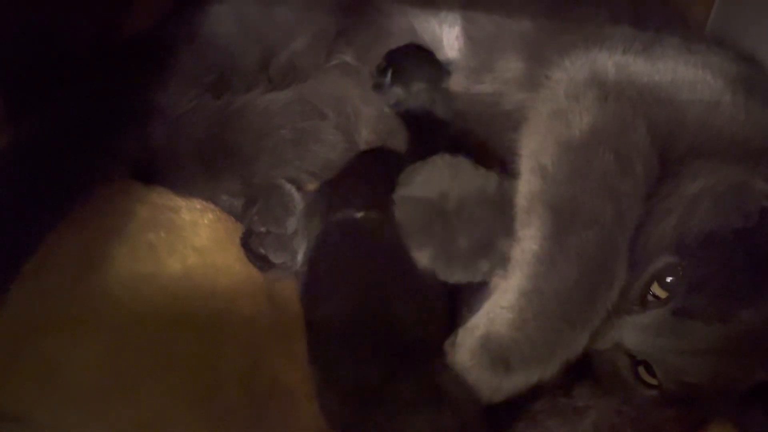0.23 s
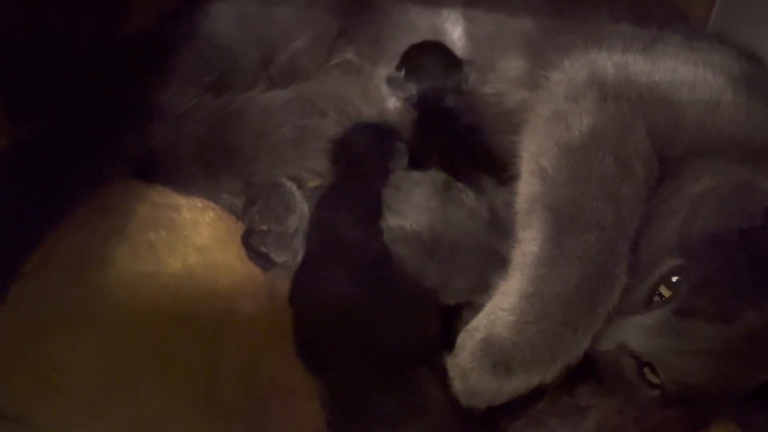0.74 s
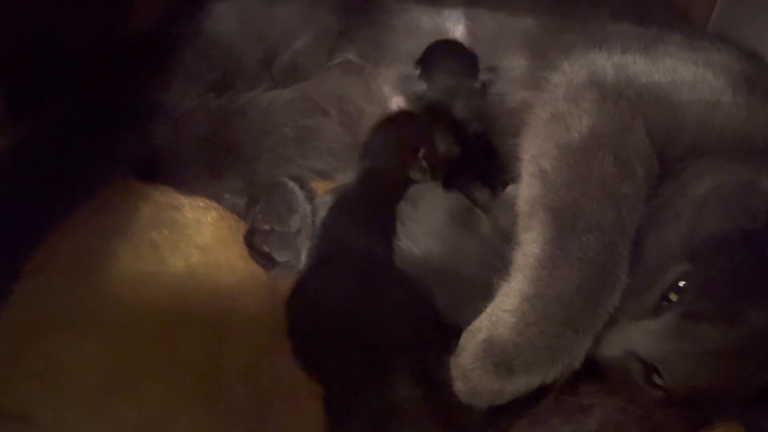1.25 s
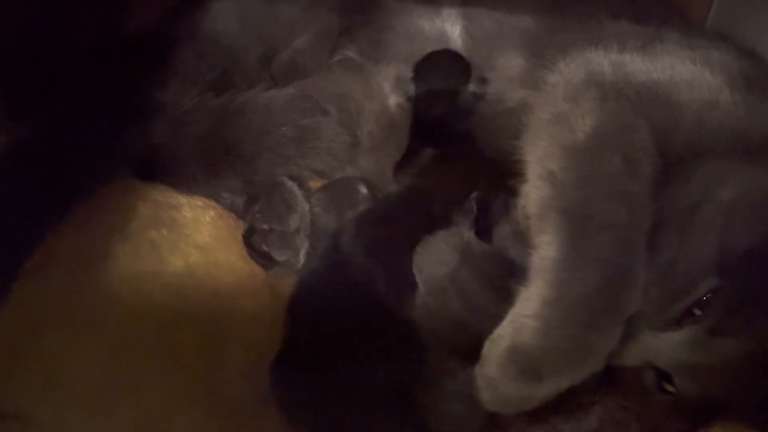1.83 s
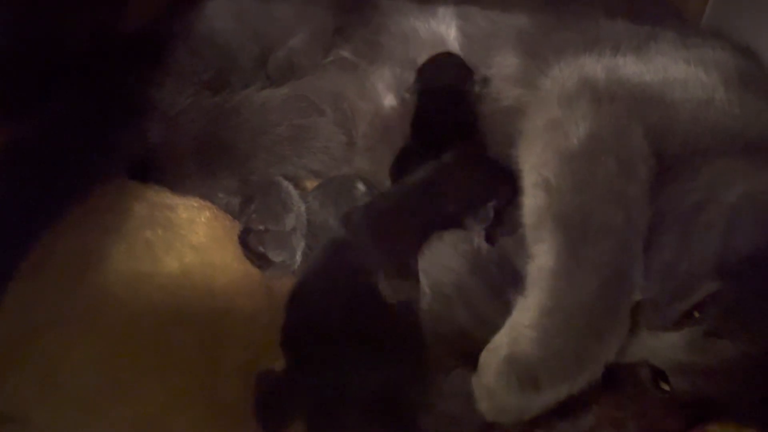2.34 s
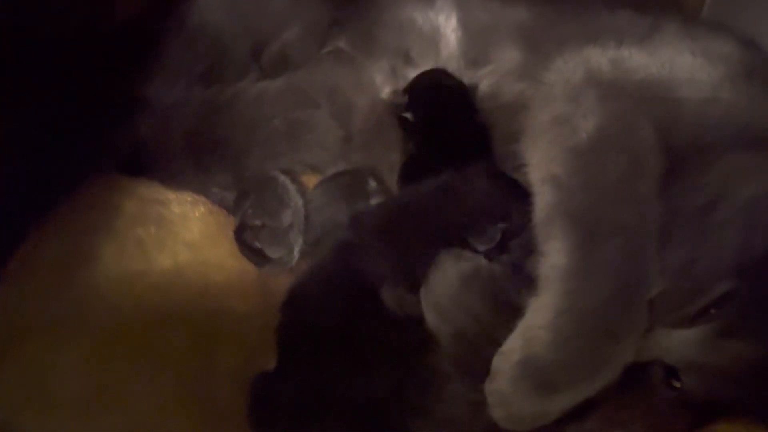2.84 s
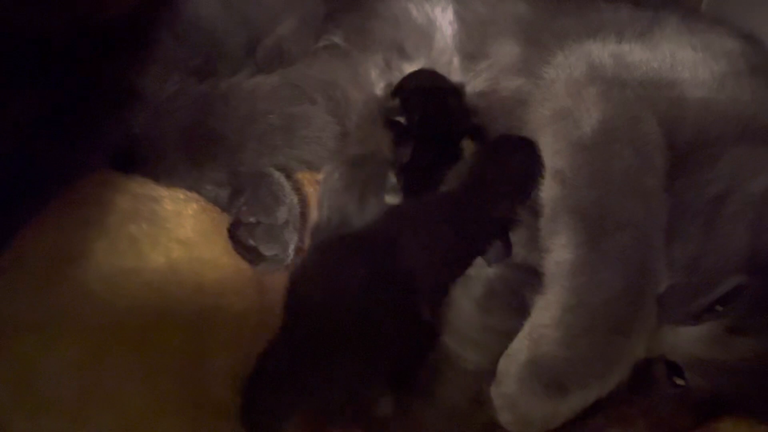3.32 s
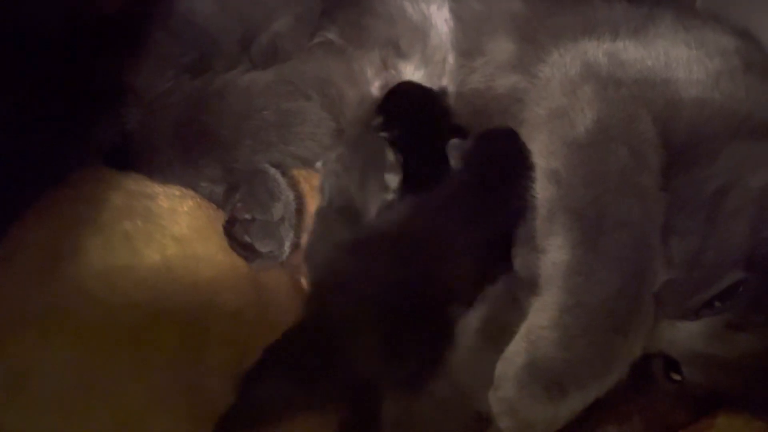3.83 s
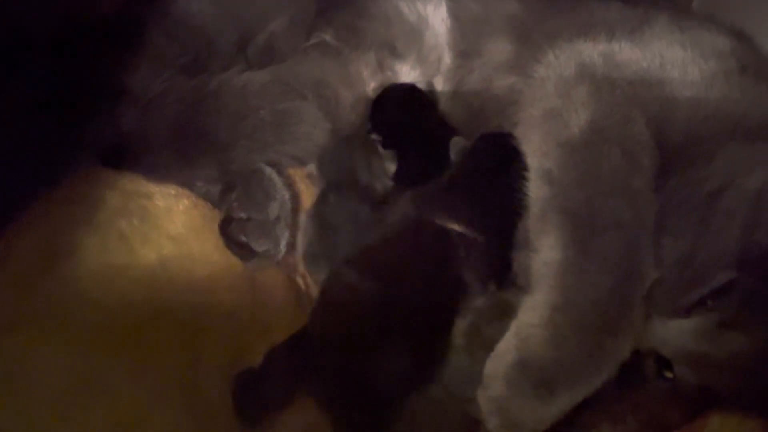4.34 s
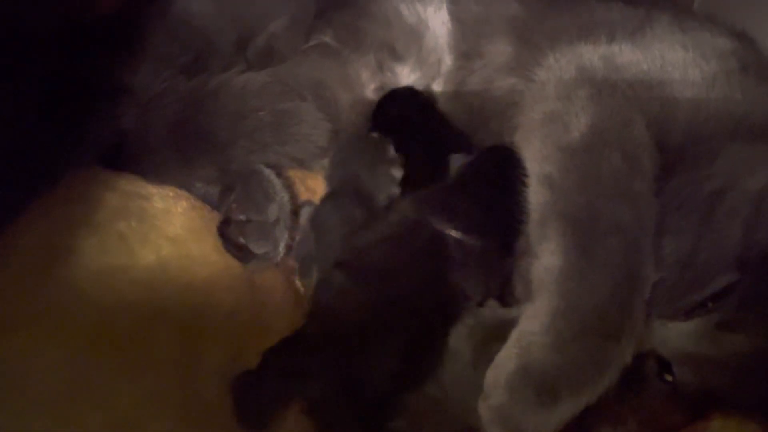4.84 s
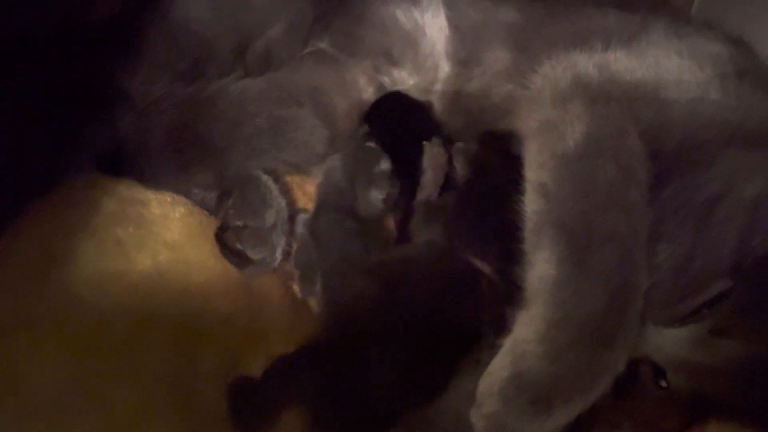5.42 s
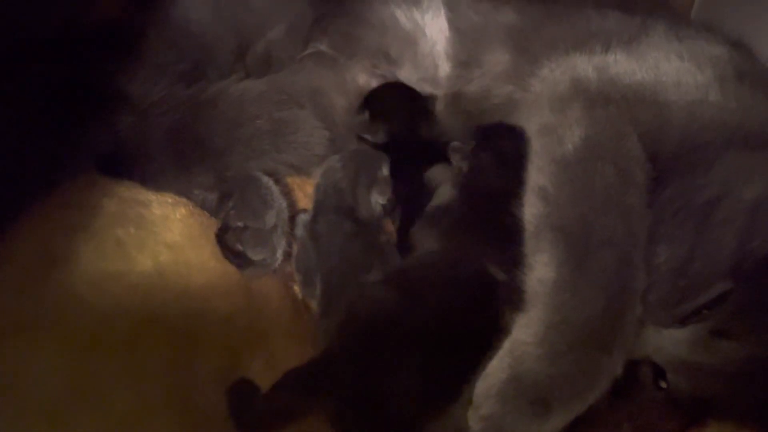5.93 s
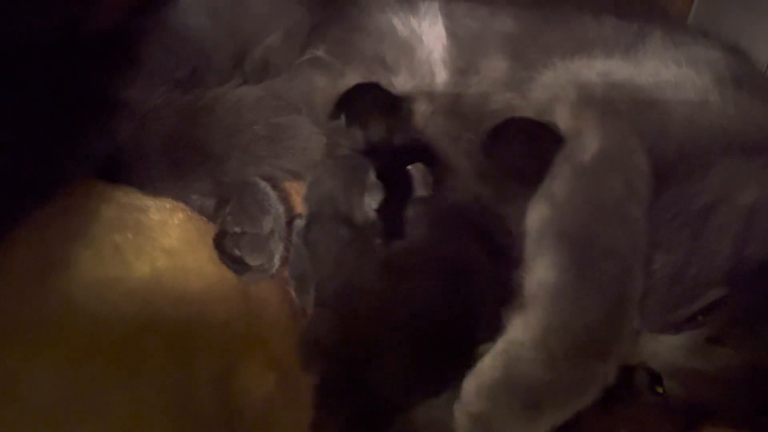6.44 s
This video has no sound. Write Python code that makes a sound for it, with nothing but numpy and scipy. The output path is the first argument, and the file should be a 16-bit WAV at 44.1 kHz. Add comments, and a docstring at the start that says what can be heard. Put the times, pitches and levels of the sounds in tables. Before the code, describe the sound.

Newborn kittens mew thinly, raspy starts rising to clear high cries, over their mother's soft purr, with wet mouth clicks and dull nest-box bumps.

```python
"""In a nest box, newborn kittens crawl over their purring mother, close to the microphone.
Four thin mews, built from wavering harmonics, start with a rasp and rise to a clean cry.
Short squeaks, rasps and wet mouth clicks, made of shaped noise, fall within and between them.
The purr is a train of pulses. Paws tap and bump the box as noise and fading tones, and noise in
small slips makes the bedding rustle. Fur brushes past once; faint hiss and rumble lie behind."""
import sys
import numpy as np
from scipy import signal
from scipy.fft import rfft, irfft, next_fast_len
from scipy.io import wavfile
from scipy.ndimage import uniform_filter1d, map_coordinates

SR = 44100
rng = np.random.default_rng(int(sys.argv[2]) if len(sys.argv) > 2 else 0)


def to_wav(sig):
    """Store sig (one row per channel, or 1-D mono) as 16-bit WAV at the path in sys.argv[1].

    Samples outside -1..1 are clipped; the rate is SR.
    """
    pcm = np.clip(np.atleast_2d(sig), -1, 1) * 32767
    pcm = np.round(pcm).astype(np.int16)
    wavfile.write(sys.argv[1], SR, pcm.T)  # frames by channels


N = 294147  # length of the scene in samples
TOP_HZ = 14900  # upper limit of all sound

# air rushing through a kitten's throat: f/Hz, level/dB
RASP = [(600, -30), (1400, -22), (1900, -9), (2800, 0), (3250, -3), (3750, -16), (4500, -3), (5200, -10),
        (6000, -27), (8200, -38), (11000, -30), (15000, -40)]


def amp(db):
    """Turn decibels into gain."""
    return 10 ** (np.asarray(db) / 20)


def unit(x):
    """Scale x to an rms (average strength) of 1."""
    return x / np.sqrt(np.mean(x ** 2) + 1e-20)


def along(points, hz):
    """Read a table of (f/Hz, value) at any frequency, on a log axis."""
    f, v = np.transpose(points)
    return np.interp(np.log(hz + 1), np.log(f), v)


def curves(rows, t):
    """Read each column after the time at times t."""
    s, *cols = np.transpose(rows)
    return [np.interp(t, s, c) for c in cols]


def swells(rows, edge, t):
    """Gain at times t of (t/s, length/s, level/dB) events that rise, hold and fall; edge in s."""
    total = 0
    for s, length, db in rows:
        to_nearest_end = np.minimum(t - s, s + length - t)
        total = total + amp(db) * np.sin(np.pi / 2 * np.clip(to_nearest_end / edge, 0, 1))
    return total


def wobble(rate, size):
    """A smooth random curve with rate random points a second."""
    points = rng.standard_normal(int(size * rate / SR) + 4)
    return map_coordinates(points, [np.arange(size) * rate / SR])


def filtered(x, gain):
    """Multiply the spectrum of x by a gain that depends on frequency."""
    n = x.shape[-1]
    m = next_fast_len(n + 8192)  # spare room keeps the end from wrapping onto the start
    return irfft(rfft(x, m) * gain(np.fft.rfftfreq(m, 1 / SR)), m)[..., :n]


def noise(spectrum, size):
    """Noise coloured by a (f/Hz, level/dB) table, at rms 1."""
    white = rng.standard_normal(size)
    return unit(filtered(white, lambda hz: amp(along(spectrum, hz))))


def response(spectrum, size=8192):
    """How a body with this spectrum rings after one sharp push, with nothing before the push."""
    cepstrum = irfft(np.log(amp(along(spectrum, np.fft.rfftfreq(size, 1 / SR)))))
    # folding the cepstrum onto positive times gives the earliest possible ringing
    cepstrum[1:size // 2] *= 2
    cepstrum[size // 2 + 1:] = 0
    return irfft(np.exp(rfft(cepstrum)))


def add(track, s, sound):
    """Mix a sound into the track at time s."""
    part = track[max(0, round(s * SR)):][:len(sound)]
    part += sound[:len(part)]


def share(gain, hz):
    """Silence harmonics above the top limit and scale the rest to a total power of 1."""
    kept = gain * (hz < TOP_HZ)
    return kept / np.linalg.norm(kept, axis=0)


def mew(rows, settle, throat_ratio, fundamental_db, flutter_db, jitter=0.055, quiver=0.0058,
        shimmer=0.55, rasp=0.054, edge=0.001, muffle_hz=7800, count=36):
    """One cry: harmonics of the vocal folds, which beat unevenly at first, shaped by the opening mouth."""
    # the throat's resonances with the mouth nearly shut, half open and wide open: f/Hz, level/dB
    mouth_shut = [(450.0, -14), (650.0, -10.5), (900.0, -9.5), (1100.0, -27), (1350.0, -16.5),
                  (1750.0, -22), (2200.0, -13), (2900.0, -0.0), (3350.0, -7.5), (3800.0, -17.5),
                  (4250.0, -12), (4650.0, -20.5), (5400.0, -29), (6400.0, -59), (7600.0, -55)]
    mouth_half = [(450.0, -34), (650.0, 0.5), (900.0, -13), (1100.0, -16), (1350.0, -14), (1750.0, 1.5),
                  (2200.0, -16.0), (2900.0, -24), (3350.0, -29), (3800.0, -18.5), (4250.0, -23.5),
                  (4650.0, -55), (5400.0, -62), (6400.0, -41.5), (7600.0, -64)]
    mouth_wide = [(450.0, 0.0), (650.0, 4), (900.0, -10.0), (1100.0, -18), (1350.0, -31), (1750.0, -9),
                  (2200.0, 4), (2900.0, -17), (3350.0, -46), (3800.0, -35), (4250.0, -28.5), (4650.0, -28),
                  (5400.0, -36), (6400.0, -25.5), (7600.0, -61)]
    # where the lift of the treble acts: f/Hz, share (0-1)
    treble_share = [(2900, 0.09), (4300, 0.91)]
    # times when the voice strains and gains a shrill top: t/s, length/s, relative level/dB
    strains = [(.835, 0.085, -78.5), (2.605, 0.054, -90), (2.85, 0.1, -92.5), (3.36, 0.5, -100),
               (5.98, 0.19, -72.5), (6.15, 0.17, -73.5), (6.33, 0.37, -79)]
    # colour of that shrill top: f/Hz, level/dB
    shrill_spectrum = [(6000, -35), (7700, -8), (8400, -41), (9700, -6.5), (11000, -3), (12300, 6),
                       (13500, -10.5), (15000, -25)]
    strain_edge_s = .015
    onset_rough, clean_rough = 0.51, 0.027  # roughness added at the start, and once settled

    t = np.arange(rows[0][0], rows[-1][0], 1 / SR)
    n = len(t)
    pitch, level_db, opening, treble_db = curves(rows, t)
    rough = clean_rough + onset_rough * np.exp(-((t - t[0]) / settle) ** 2)
    unsteady = quiver * wobble(69.92, n) + jitter * rough * wobble(600, n)
    pitch = uniform_filter1d(pitch, size=950) * (1 + unsteady)
    phase = 2 * np.pi * np.cumsum(pitch) / SR
    k = np.arange(1, count + 1)[:, None]  # harmonic numbers
    hz = k * pitch

    # the harmonics slide through resonances that change as the mouth opens
    shut, wide = np.clip(1 - 2 * opening, 0, 1), np.clip(2 * opening - 1, 0, 1)
    shapes = [(shut, mouth_shut), (1 - shut - wide, mouth_half), (wide, mouth_wide)]
    throat_db = sum(weight * along(shape, hz / throat_ratio) for weight, shape in shapes)
    throat_db = throat_db + fundamental_db * (k == 1)
    colour = amp(throat_db + treble_db * along(treble_share, hz)) / (1 + (hz / muffle_hz) ** 20)
    gains = amp(level_db) * share(colour, hz)

    shrill_flutter_db = 6.1 * np.array([wobble(25, n) for _ in k])
    shrill = share(amp(along(shrill_spectrum, hz) + shrill_flutter_db), hz)
    gains += swells(strains, strain_edge_s, t) * shrill
    # upper harmonics waver more than the lowest ones
    gains *= amp(flutter_db * np.minimum(k, 4) * np.array([wobble(44.9, n) for _ in k]))

    voice = np.sqrt(2) * np.sum(gains * np.sin(k * phase), axis=0)
    voice *= 1 + shimmer * rough * wobble(500, n)
    # turbulence escapes once per cycle
    air = rasp * rough * np.linalg.norm(gains, axis=0) * noise(RASP, n) * (1 + np.cos(phase))
    fade = np.clip(np.minimum(t - t[0], t[-1] - t) / edge, 0, 1)
    return (voice + air) * fade


def kittens(width_hz=380, focus_db=13, mew_db=0.24):
    """The long mews, and short bursts of throaty noise: squeaks, and hoarse rasps at the mews' edges."""
    # one table per mew: t/s, pitch f/Hz, relative level/dB, mouth opening (0-1), lift of the treble/dB
    mews = [
        [(0.833, 276.8, -77, 0.0, -5), (0.865, 413, -63, 0.0, 5), (0.895, 438, -63.5, 0.0, 11),
         (0.92, 512, -62, 0.02, 8), (0.95, 607, -63.5, 0.12, 4), (0.975, 565, -67.4, 0.1, 1),
         (1.015, 689, -68, 0.14, -5), (1.07, 639, -67, 0.17, -10.0), (1.1, 697, -69, 0.14, -19),
         (1.135, 712, -69, 0.12, -15), (1.19, 891, -63, 0.37, 5), (1.255, 947, -64, 0.35, -6),
         (1.292, 887, -58, 0.42, 10)],
        [(2.6, 530.5, -64, 0.3, 3), (2.655, 729.0, -61.5, 0.05, -6), (2.72, 710.5, -64.8, 0.09, -9.0),
         (2.775, 722, -67.3, 0.25, -8), (2.83, 965, -57, 0.63, -4), (2.88, 990.0, -64, 0.46, -4),
         (2.95, 940.4, -60.6, 0.41, -2), (3.06, 1002, -58, 0.49, -0.5), (3.14, 896, -56, 0.32, -4.5),
         (3.255, 1018, -55, 0.57, -8.0), (3.325, 967, -46, 0.75, -16.5), (3.38, 940, -49, 0.82, -9),
         (3.435, 882, -47.5, 0.7, -8.5), (3.48, 913.4, -49, 0.76, -11.5), (3.55, 894.4, -48.5, 0.77, -10),
         (3.61, 929.6, -49, 0.76, -8), (3.68, 904, -49, 0.72, -5.0), (3.735, 900, -48.5, 0.84, -9.0),
         (3.79, 663, -56, 0.47, 1.5), (3.81, 637, -61, 0.6, -2)],
        [(5.3, 769, -66, 0.4, 12), (5.34, 803, -63.5, 0.31, 6), (5.38, 860, -62.5, 0.29, -6),
         (5.415, 871, -64, 0.29, -2), (5.455, 942, -65.5, 0.32, 3), (5.51, 856, -61, 0.3, -3),
         (5.562, 863, -60, 0.38, 2.0)],
        [(5.87, 555, -66.5, 0.17, 11), (5.91, 664, -63, 0.1, 0.5), (5.96, 924, -61.5, 0.16, 14),
         (5.992, 946, -59, 0.17, 5), (6.04, 963, -61, 0.25, 5.0), (6.085, 994, -58.5, 0.15, -2.0),
         (6.125, 930, -60, 0.18, 2), (6.175, 982.0, -62.5, 0.28, -4), (6.225, 1110, -57.5, 0.82, 2),
         (6.275, 1040, -51.5, 0.96, 1.0), (6.33, 1131, -56.5, 0.91, 2), (6.41, 1148, -58, 1.0, 9),
         (6.51, 1107, -55, 0.72, 11.5), (6.575, 1046, -55.5, 0.76, -7.5), (6.62, 1143, -52.3, 0.77, 1),
         (6.668, 983, -47, 0.65, -16)],
    ]
    # the voice of each mew: time for the folds to settle/s, throat resonances as a ratio of the usual,
    # lift of the fundamental/dB, flutter/dB
    voices = [(.11, 0.992, -3.5, 0.65), (.035, 0.986, 0.4, 0.24), (.015, 1.022, 3.5, .7),
              (.07, 1.006, 1, 0.73)]
    # short hoarse squeaks and rasps: t/s, length/s, level/dB, resonance f/Hz
    bursts = [(.008, 0.041, -78, 3670), (0.251, 0.033, -76, 3360), (0.563, 0.011, -83.5, 3270),
              (0.824, 0.096, -68.5, 3000), (0.817, 0.13, -72.5, 4840), (0.969, 0.022, -70.5, 2210),
              (1.287, 0.045, -76.5, 2200), (1.29, 0.04, -78, 3500), (1.636, 0.034, -63.5, 2320),
              (1.655, 0.026, -74.5, 4420), (2.238, .032, -73, 2550), (2.239, 0.026, -70.5, 3840),
              (2.604, 0.029, -73, 3720), (3.778, 0.016, -74, 2540), (3.78, 0.036, -74.5, 3890),
              (5.292, 0.018, -70.5, 2200), (5.287, 0.02, -82, 3940), (5.862, 0.05, -81, 2680),
              (5.557, 0.038, -77, 3000)]

    out = np.zeros(N)
    for rows, voice in zip(mews, voices):
        add(out, rows[0][0], amp(mew_db) * mew(rows, *voice))
    for s, length, db, hz in bursts:
        n = int(length * SR)
        creak = noise(RASP, n) * amp(3.3 * wobble(600, n))
        # one resonance stands out
        creak = filtered(creak, lambda f: 1 + amp(focus_db) / (1 + ((f - hz) / width_hz) ** 4))
        add(out, s, amp(db) * unit(creak) * signal.windows.tukey(n, .5))
    return out


def clicks(t60=0.015, soft=0.00025):
    """Lips and tongues part with a tiny wet snap: noise that fades by 60 dB in t60 s."""
    # wet mouth clicks: t/s, relative level/dB, middle/dB, top/dB
    snaps = [(0.179, -65, -17, -1), (0.9856, -52, -9, -1), (1.29, -51.5, 7, -52), (1.6591, -53, -3, -25),
             (1.6716, -54, -6.5, -15), (1.6905, -61, -3, -32), (2.131, -63.5, -11, -44),
             (2.2276, -53, -11, -46), (2.579, -57.5, -2, -31), (2.598, -54, -9, -31.5),
             (5.0503, -53.5, -3.5, -13.5), (5.558, -53.5, 0, -54), (5.967, -49, -9, -4.5),
             (5.98, -52, -0.5, -5)]
    # colours of the middle and the top: f/Hz, level/dB
    mouth = [(500, -7.5), (1300, -22), (1900, 9.5), (2700, -4.5), (3300, -1.5), (4400, -8),
             (5600, -22.5), (9000, -46.0)]
    spit = [(5000, -8), (7000, -8), (8200, -17), (10800, 6), (13000, -4.5), (15000, -10.5)]

    out, t = np.zeros(N), np.arange(SR // 20) / SR
    shape = amp(-60 * t / t60) * (1 - np.exp(-t / soft))
    for s, db, middle_db, top_db in snaps:
        snap = amp(middle_db) * noise(mouth, len(t)) + amp(top_db) * noise(spit, len(t))
        add(out, s, amp(db - 2.5) * unit(snap) * shape)
    return out


def paws(tap_t60=0.041, thud_t60=0.02, thud_hz=330, soft=0.0015):
    """Light taps on the box wall, and heavy bumps that set its floor booming and its walls humming."""
    # paws and claws tapping the box: t/s, tap level/dB, relative thud level/dB
    taps = [(2.486, -51.5, -13), (3.852, -61.5, 12.5), (5.052, -52.5, 5), (6.263, -63.5, -8),
            (6.372, -54, -16)]
    # bodies bumping the box: t/s, level/dB, floor ring f/Hz, time to fade by 60 dB/s, rise/s,
    # relative wall ring/dB
    bumps = [(1.835, -46.5, 99.7, 0.12, 0.026, 1.5), (2.368, -23, 67.4, 0.15, 0.012, -32.5),
             (2.439, -37.5, 54.4, 0.69, 0.0051, -42), (3.253, -58, 81.7, 0.17, 0.035, 10.5),
             (4.633, -26, 96.7, 0.16, 0.015, -9), (4.696, -27, 81.8, 0.12, 0.0039, -13.5),
             (4.77, -35, 64.3, 0.25, 0.0076, -16.5), (5.054, -42, 89, 0.13, 0.0017, -2.5),
             (6.01, -14, 57.8, 0.25, 0.033, -37.5), (6.09, -30, 94, 0.25, 0.0043, -28),
             (6.143, -25, 57, 0.28, 0.014, -41), (6.254, -28, 60.1, 0.11, 0.0063, -31.5)]
    # tones of the box walls: f/Hz, relative level/dB, time to fade by 60 dB/s
    wall_modes = [(140, -1, .2), (172, -4, .2), (237, 1, .25), (285, -4, .16), (335, -7, .17),
                  (375, -11, .22), (430, -12, .18)]
    # colour of a tap: f/Hz, level/dB
    tap_spectrum = [(200, -16.0), (500, 3.5), (1100, -8), (2000, -21.5), (4000, -28.5), (12000, -38.5)]

    out, t = np.zeros(N), np.arange(SR * 3 // 4) / SR
    for s, db, thud_db in taps:
        tap = noise(tap_spectrum, len(t)) * amp(-60 * t / tap_t60)
        thud = np.sin(2 * np.pi * thud_hz * t) * amp(thud_db - 60 * t / thud_t60)
        add(out, s, (amp(db) * tap + amp(db - 10.0) * thud) * (1 - np.exp(-t / soft)))
    for s, db, floor_hz, t60, rise, wall_db in bumps:
        floor = -amp(-60 * t / t60) * np.sin(2 * np.pi * floor_hz * t)
        walls = np.zeros(len(t))
        for hz, level, life in wall_modes:
            walls += amp(level - 60 * t / life) * np.sin(2 * np.pi * (hz * t + rng.random()))
        ring = floor + amp(wall_db - 7.5) * walls
        add(out, s, amp(db) * ring * (1 - np.exp(-(t / rise) ** 2)))
    return out


def purr(rate_hz=27.8, murk_db=-7):
    """The mother's larynx snaps open in slow pulses that thump through her chest."""
    # she purrs in swells, as she draws air and as she lets it out: t/s, length/s, relative level/dB
    breaths = [(-.06, 0.12, -53), (.1, 0.19, -58.5), (.33, 0.26, -63.5), (.65, 0.095, -66),
               (.79, .4, -55.5), (1.27, 0.29, -61), (1.56, 0.16, -60.5), (1.81, .34, -52.5),
               (2.2, 0.26, -62), (2.52, 0.22, -62.5), (2.83, 0.55, -53.5), (3.37, .36, -61.5),
               (3.74, 0.33, -58), (4.01, 0.36, -52), (4.48, 0.18, -59), (4.8, 0.38, -56),
               (5.2, 0.34, -52.5), (5.49, 0.14, -49.5), (5.61, .15, -54), (5.77, 0.63, -59),
               (6.31, 0.41, -52)]
    # colour of her chest: f/Hz, level/dB
    chest_spectrum = [(20, -42), (30, -20.5), (42, -13.5), (56, 4.5), (85, 3), (115, -1), (165, -9),
                      (230, -18.5), (300, -39.5), (500, -43.5), (1200, -81)]
    edge_s, rest_db = 0.083, -71.5  # rise and fall of a swell; level always present beneath the swells

    effort = amp(rest_db) + swells(breaths, edge_s, np.arange(N) / SR)
    rate = rate_hz * (1 + 0.022 * wobble(3, N) + .02 * wobble(25, N))
    cycles = np.cumsum(rate) / SR
    # one pulse as each cycle completes, of uneven strength
    pulses = np.diff(np.floor(cycles), prepend=0) * amp(2.4 * wobble(28, N))
    chest = unit(signal.fftconvolve(pulses, response(chest_spectrum))[:N])
    return effort * (chest + amp(murk_db) * noise(chest_spectrum, N))


def fur():
    """Fur brushes past with a faint high fizz: a swell of treble noise."""
    # t/s, length/s, level/dB
    brushes = [(.13, .2, -88.5)]
    # colour of the fizz: f/Hz, level/dB
    fizz = [(7000, -30), (10000, -10), (13000, 1), (15000, -4)]
    return swells(brushes, 0.045, np.arange(N) / SR) * noise(fizz, N)


def bedding(grain_db=3.0, cloth_db=10, restless_db=2):
    """Cloth rustles in small dull slips: loud after each shove, faint all the time."""
    # the bedding is pushed aside and settles: t/s, relative level/dB, time to fade by 60 dB/s
    shoves = [(.115, -69, 0.4), (0.406, -74, 0.36), (.92, -77, 0.52), (1.29, -73.5, 0.79),
              (1.83, -61, 0.47), (2.36, -73.5, 0.34), (2.475, -59, 0.17), (3.23, -71, 0.59),
              (3.6, -72.5, 1.17), (3.835, -65, 0.24), (3.9, -69.5, 0.43), (4.05, -73.5, 1),
              (4.625, -50.5, 0.53), (5.043, -51, 0.079), (6.0, -52.5, 0.54), (6.25, -62, .15),
              (6.365, -64.5, .18)]
    # colour of the cloth: f/Hz, level/dB
    cloth_spectrum = [(35, -10.5), (70, 10.5), (140, 11.5), (240, 3.5), (330, -5), (500, -15), (900, -34),
                      (2000, -52), (6000, -65.5)]
    rise_s, rest_db = 0.012, -83  # how fast a shove takes hold; relative level of the constant rustle

    motion, t = amp(rest_db + restless_db * wobble(2, N)), np.arange(SR) / SR
    for s, db, t60 in shoves:
        add(motion, s, amp(db - 60 * t / t60) * (1 - np.exp(-(t / rise_s) ** 2)))
    slips = amp(grain_db * wobble(70, N))
    shared = unit(slips * noise(cloth_spectrum, N))
    apart = unit(slips * noise(cloth_spectrum, N))
    # the second noise has opposite signs left and right, which widens the rustle
    return amp(cloth_db) * motion * (shared + amp(-8.5) * apart * [[1], [-1]])


def box(x, t60=0.12):
    """The padded box answers briefly: each side has its own fading noise as an echo."""
    t = np.arange(SR // 5) / SR
    spectrum = [(120, -28.5), (300, -5.0), (5000, -7), (14000, -6)]  # f/Hz, level/dB
    sides = np.array([noise(spectrum, len(t)), noise(spectrum, len(t))])
    tail = sides * amp(-60 * t / t60) * (t > .002)
    return signal.fftconvolve(x[None], tail / np.linalg.norm(tail[0]), axes=1)[:, :N]


def place(x):
    """Give the left and right ports of the microphone their own level and timing at each frequency."""
    # how much louder the left is than the right: f/Hz, difference/dB
    side_levels = [(100, 1), (400, 6), (700, 3.5), (900, 7), (1100, -7), (1850, -1), (2200, 1.5), (4200, 2),
                   (9000, 1.5)]
    # how far the left port leads the right: f/Hz, lead/radians
    left_lead = [(100, 0.13), (700, -0.34), (1700, -0.18), (2500, .4), (4200, 0.87), (6000, 1),
                 (11000, 0.43)]
    ports = np.array([[.5], [-.5]])  # each port takes half of the difference

    def port_gain(hz):
        return amp(along(side_levels, hz) * ports) * np.exp(1j * along(left_lead, hz) * ports)

    return filtered(x, port_gain)


def still_air(hiss_db=-83.5):
    """Still air hisses faintly: one noise shared by both sides, one with opposite signs."""
    # f/Hz, level/dB
    hiss_spectrum = [(240, -25.5), (400, -2.5), (689, -3.5), (1020, -10.5), (2140, -17), (3970, -19),
                     (4350, -16.5), (4980, -21), (7150, -25.5), (8190, -39.5), (10700, -24), (11900, -27.5),
                     (14800, -34.5)]
    shared, apart = noise(hiss_spectrum, N), noise(hiss_spectrum, N)
    return amp(hiss_db) * (shared + amp(-1.5) * apart * [[1], [-1]])


def rumble(rumble_db=-78.5):
    """The room's rumble: steady deep noise, alike on both sides."""
    # f/Hz, level/dB
    rumble_spectrum = [(22, 2.5), (45, -2.5), (80, -18), (200, -53.5)]
    return amp(rumble_db) * noise(rumble_spectrum, N)


def scene():
    """Kittens, mother and bedding in the box, over faint hiss and rumble."""
    near = kittens() + clicks() + paws() + fur()
    direct = place(near + purr())
    return direct + amp(-10.5) * box(near) + bedding() + still_air() + rumble()


def record(dry, low_cut_hz=38):
    """The microphone rolls off the deepest bass; nothing is kept above the top limit."""
    return filtered(dry, lambda hz: (hz < TOP_HZ) * hz ** 2 / np.sqrt(hz ** 4 + low_cut_hz ** 4))


dry = scene()
out = record(dry)
to_wav(out)
```